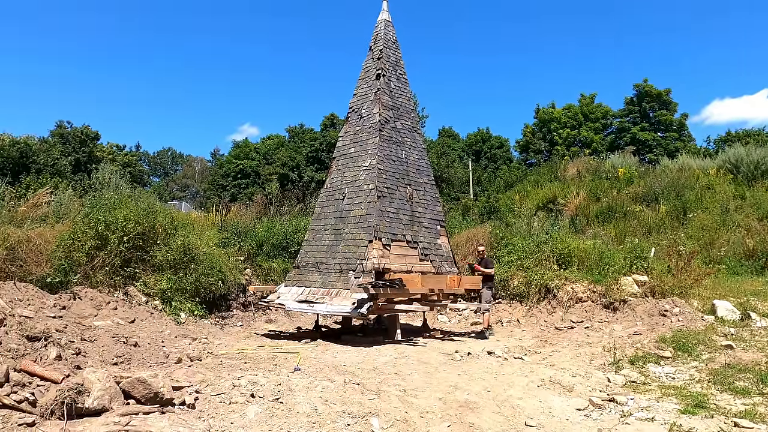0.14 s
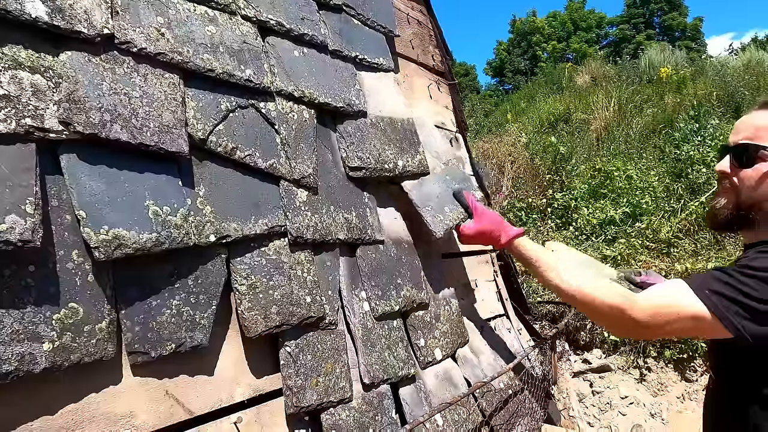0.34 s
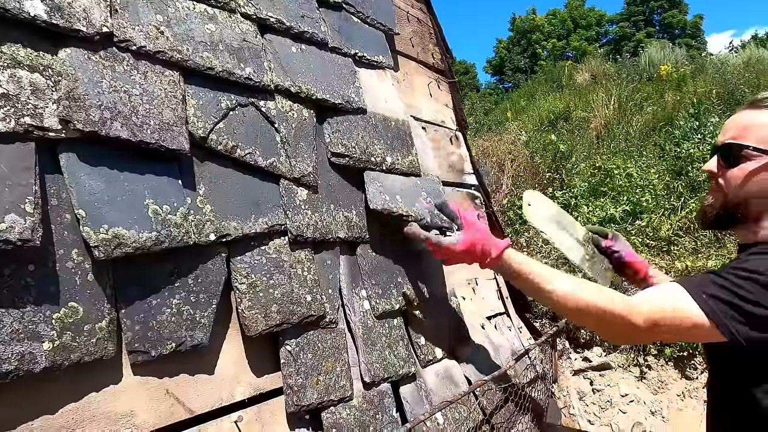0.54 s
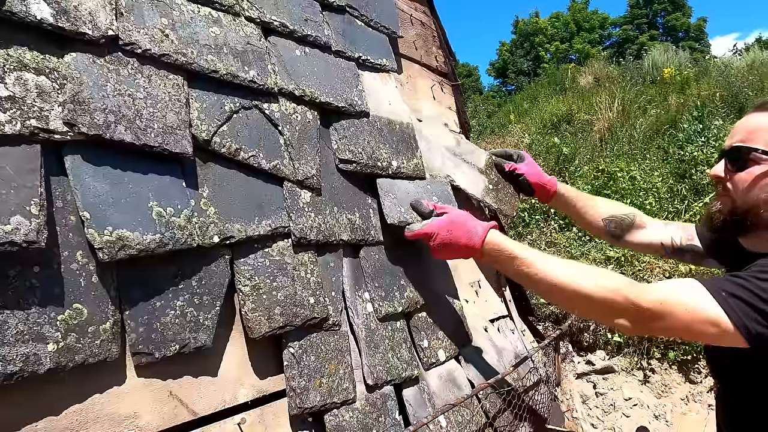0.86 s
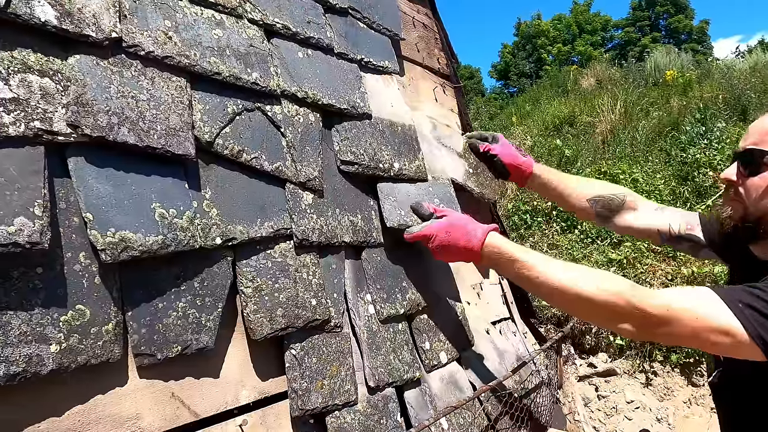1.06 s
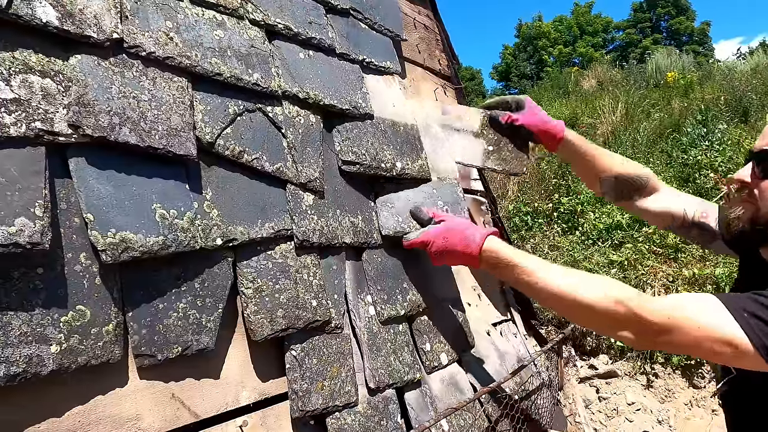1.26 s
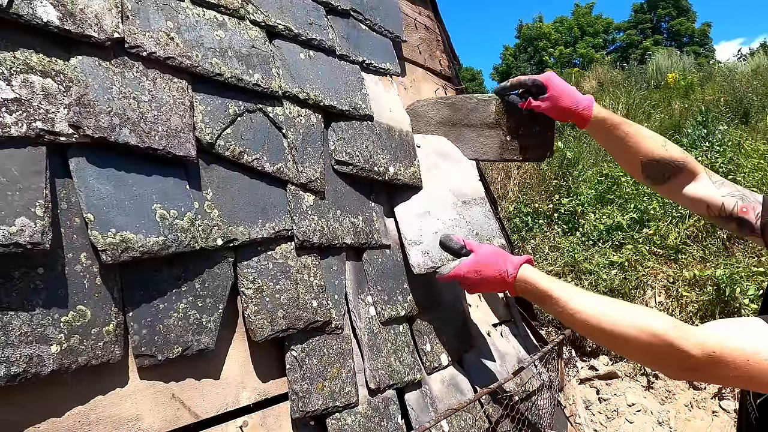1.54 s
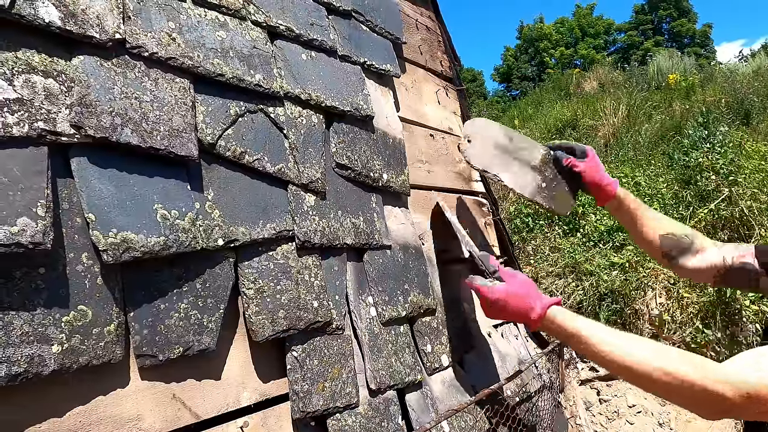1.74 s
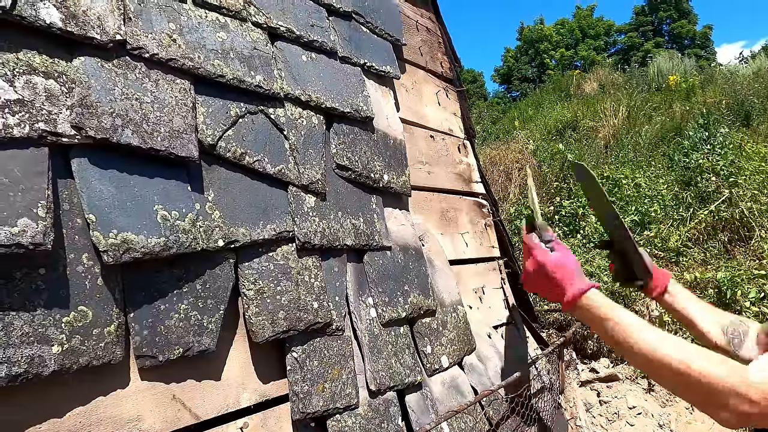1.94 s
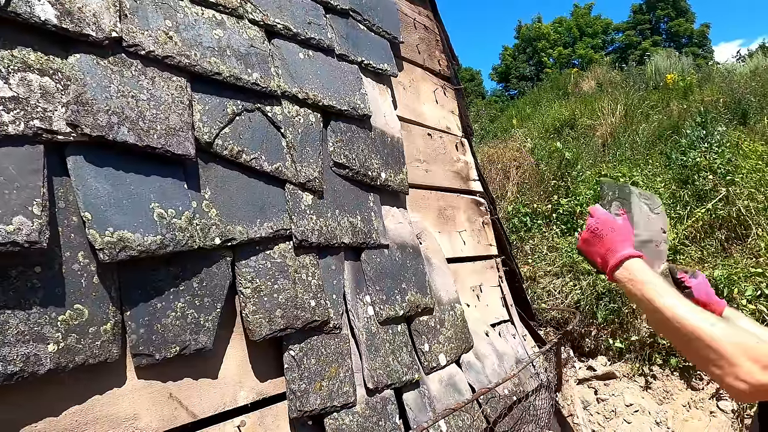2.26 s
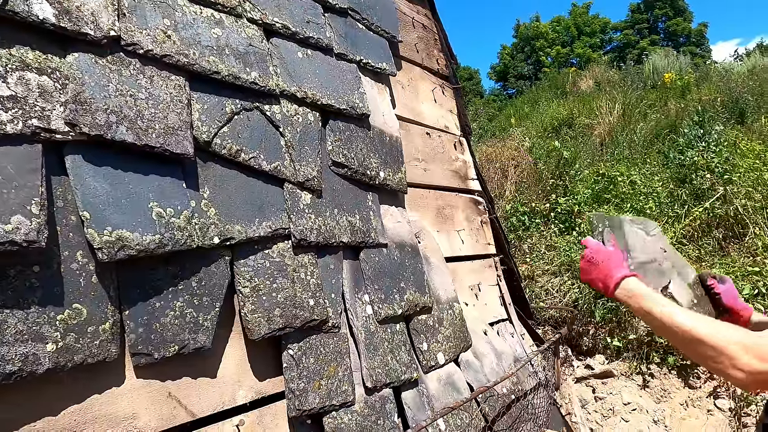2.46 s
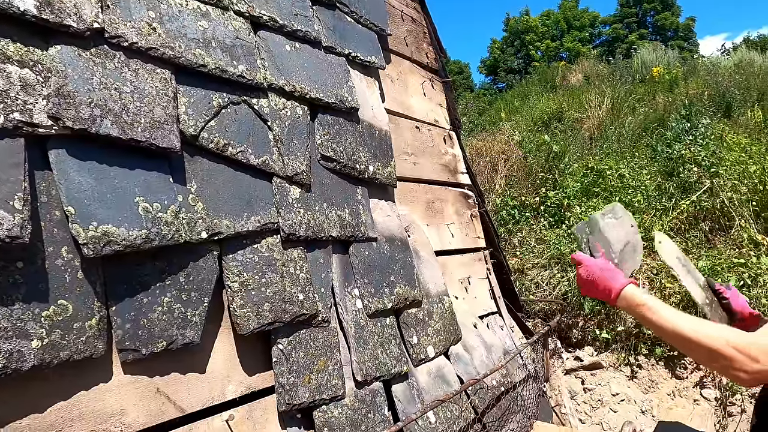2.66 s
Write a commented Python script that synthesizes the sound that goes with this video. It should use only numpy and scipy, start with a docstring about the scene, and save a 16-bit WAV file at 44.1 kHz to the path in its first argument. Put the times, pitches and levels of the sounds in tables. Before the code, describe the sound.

Slate scrapes and clacks harshly as it is pulled off a boarded roof, over low wind rumble.

```python
"""Outdoors, gloved hands work a slate loose from a boarded roof: crushed grit grinds, and each jolt excites
the damped resonances of the slate, the heavy ones with a thump of the boarding; loosened grit trickles.
Two loose slates are then rubbed and clinked together: noise and cracks excite their modes. A soft low hoot
is a sine of wavering pitch. Roof and ground answer as a decaying noise tail. Wind rumbles on the microphone
ports as gusty low noise that differs between left and right, over a faint open-air hiss."""
import sys
import numpy as np
from scipy import signal
from scipy.fft import rfft, irfft, next_fast_len
from scipy.io import wavfile
from scipy.ndimage import map_coordinates

SR = 44100
rng = np.random.default_rng(int(sys.argv[2]) if len(sys.argv) > 2 else 0)


def invert_db(level):
    """Linear amplitude ratio for a level in decibels (20 dB per decade), elementwise."""
    return 10 ** (np.asarray(level, dtype=float) / 20)


def transcribe(u):
    """Save the signal u as a 16-bit wav file named by the first command-line argument.

    u: samples, shape (n,) or (channels, n), limited to [-1, 1]; the rate is SR.
    q: integer samples, one column per channel.
    """
    v = np.clip(np.atleast_2d(u).T, -1, 1)
    q = np.round(v * 32767).astype(np.int16)
    wavfile.write(sys.argv[1], SR, q)


N = 123480  # samples

# Broad spectrum of slate on slate. Each row: frequency in Hz, relative level in dB per Hz.
GRIND_COLOUR = [(60, -49), (110, -11), (200, 0.5), (420, -3.5), (900, -3.5), (2500, -3.5), (4500, -14),
                (7000, -31), (11000, -49.5), (14500, -65), (15800, -82)]
# Resonances of the slate held in the roof. Each row: frequency in Hz, width in Hz, relative level in dB.
HELD_RESONANCES = [(860, 70, 1), (1015, 80, 2), (1305, 90, 2), (1740, 110, 0), (2210, 100, 2),
                   (2525, 70, 1), (2995, 100, 1), (3450, 90, 3), (3880, 90, 3), (4780, 110, 7),
                   (5850, 120, 7)]
# Modes of the two loose slates. Each row: frequency in Hz, relative level in dB, undamped t60 in seconds.
THICK_SLATE = [(478, -21, .08), (856, -14, .09), (1303, -1, .12), (1405, -5, .08), (1744, -12, .09),
               (2240, -4, .09), (2632, -14, .06), (3343, -8, .06), (3990, -10, .06), (4400, -13, .06)]
THIN_SLATE = [(1096, -14, .13), (1895, -6, .12), (2998, -4, .1), (5502, -15, .05), (5800, -14, .04)]

BROAD_SHARE = .75  # share of the force heard between the resonances
SHIFTING_DB = 5  # spread of each resonance's level; halved for the knocks
SEAT_S = .0004  # time constant of a contact's rise


def unit(x):
    """Normalization: scale to rms 1."""
    return x / np.sqrt(np.mean(x ** 2) + 1e-20)


def along(points, hz):
    """Interpolation of (Hz, value) points on a logarithmic frequency axis."""
    f, v = np.transpose(points)
    return np.interp(np.log(hz + 1), np.log(f + 1), v)


def curves(rows, outside=None):
    """Linear interpolation in time: one value per sample for each column after the time."""
    s, *cols = np.transpose(rows)
    return [np.interp(np.arange(N) / SR, s, c, outside, outside) for c in cols]


def wobble(rate):
    """Slow random modulation: a smooth curve through rate random knots a second."""
    knots = rng.standard_normal(int(N * rate / SR) + 4)
    return map_coordinates(knots, [np.arange(N) * rate / SR])


def filtered(x, response):
    """Linear filtering: the spectrum of x times a complex response of frequency."""
    n = x.shape[-1]
    m = next_fast_len(n + SR // 4)
    return irfft(rfft(x, m) * response(np.fft.rfftfreq(m, 1 / SR)), m)[..., :n]


def resonances(peaks, hz):
    """Damped oscillators in parallel, causal and of alternating sign; peaks hold Hz, width in Hz, dB."""
    return sum((-1) ** k * invert_db(db) * 1j * hz * width / (centre * centre - hz * hz + 1j * hz * width)
               for k, (centre, width, db) in enumerate(peaks))


def tilt(hz, db_per_octave):
    """Spectral slope: a gain that leans about 2 kHz."""
    return invert_db(db_per_octave * np.log2((hz + 50) / 2000))


def grit(n, per_s, spread_db, share):
    """Granular friction: sparse grains of uneven size over fine noise; share is the grains' power."""
    sizes = invert_db(spread_db * rng.standard_normal(n).clip(-2, 2))
    grains = (rng.random(n) < per_s / SR) * rng.choice([-1, 1], n) * sizes
    share = np.clip(share, 0, 1)
    return np.sqrt(share) * unit(grains) + np.sqrt(1 - share) * rng.standard_normal(n)


def struck(force, t, t60, colour):
    """Impulsive excitation: a dying burst of force through a colour, scaled by its undecayed level."""
    return filtered(force * invert_db(-60 * t / t60), colour) / np.std(filtered(force, colour))


def ring(modes, t, scatter_db, db_per_octave=0, damping=1):
    """Modal synthesis: a sum of dying sines at scattered levels; damping acts most on the high modes."""
    total = 0
    for hz, db, t60 in modes:
        loss_db = 60 * t * damping ** (min(hz, 3000) / 2200) / t60
        level = invert_db(db + rng.normal(0, scatter_db) - loss_db)
        total = total + level * tilt(hz, db_per_octave) * np.sin(2 * np.pi * hz * t)
    return total


def held_slate(hz, shifts_db):
    """Source and resonator: the broad grinding colour with the slate's damped resonances on top."""
    peaks = [(centre, width, db + shift)
             for (centre, width, db), shift in zip(HELD_RESONANCES, shifts_db)]
    return invert_db(along(GRIND_COLOUR, hz)) * (BROAD_SHARE + resonances(peaks, hz))


def drag():
    """Friction: crushed grit excites the slate; harder strokes are brighter and resonances come and go."""
    # Strokes of slate over slate. Each row: time in seconds, level in dB.
    strokes = [(.215, -84), (.23, -34.5), (.33, -39), (.385, -32.5), (.43, -29), (.47, -23), (.56, -21.5),
               (.63, -25), (.675, -42.5), (.71, -33), (.76, -26), (.8, -38.5), (.825, -37.5), (.86, -44),
               (.98, -38), (1.03, -46.5), (1.12, -45.5), (1.24, -52.5), (1.28, -25), (1.35, -23),
               (1.42, -28.5), (1.47, -24.5), (1.6, -17), (1.64, -26), (1.7, -20.5), (1.74, -52),
               (1.78, -27), (1.85, -41), (1.93, -69)]
    dull_db, bright_db = -42, -14  # stroke levels at which the sound is dullest and brightest
    level_db, = curves(strokes, -120)
    force = grit(N, 1400, 3.5, .55) * invert_db(2.5 * wobble(120).clip(-2, 2))
    rung = 0
    for peak in HELD_RESONANCES:
        contact = invert_db(SHIFTING_DB * wobble(16).clip(-2, 2))  # changes as the contact moves
        rung = rung + filtered(force * contact, lambda hz: resonances([peak], hz))
    dull, sharp = (filtered(BROAD_SHARE * force + rung,
                            lambda hz: invert_db(along(GRIND_COLOUR, hz)) * tilt(hz, lean))
                   for lean in (-3, 2.5))  # dB per octave
    mix = np.clip((level_db - dull_db) / (bright_db - dull_db), 0, 1)
    return invert_db(level_db) * ((1 - mix) * unit(dull) + mix * unit(sharp))


def knocks():
    """Impact: each jolt is a dying rattle through the held slate, raised around its own pitch."""
    # Each row: start in seconds, relative level in dB, pitch in Hz, t60 of the force in seconds.
    jolts = [(0.22, -15.5, 1770, 0.051), (0.242, -16.5, 1940, 0.034), (0.275, -12.5, 1750, 0.085),
             (0.395, -4, 1040, 0.077), (0.477, -15, 1210, 0.077), (0.517, -12.5, 1760, 0.078),
             (0.7, -23, 1210, 0.046), (0.815, -24.5, 1480, 0.14), (0.89, -7, 1012, 0.18),
             (0.899, -10.5, 2450, 0.071), (0.942, -16.5, 3560, 0.069), (1.037, -8.5, 4540, 0.072),
             (1.058, -9, 1074, 0.13), (1.255, -9, 987, 0.19), (1.296, -9.5, 1204, 0.17),
             (1.314, -11, 1540, 0.24), (1.392, -9.5, 1690, 0.065), (1.482, -7, 1313, 0.091),
             (1.496, -22, 1313, 0.045), (1.552, -16, 2140, 0.053), (1.575, -6, 3500, 0.038),
             (1.617, -12.5, 5000, 0.16), (1.63, -6.5, 2480, 0.065), (1.649, -11, 3020, 0.11),
             (1.674, -12.5, 1520, 0.15), (1.706, -9.5, 3130, 0.092), (1.727, -7, 4050, 0.078),
             (1.787, -9.5, 2374, 0.093), (1.867, -32, 3630, 0.056)]
    sharpness, height_db = 14, 14  # of the resonance at each jolt's pitch
    out, t = np.zeros(N + SR), np.arange(SR // 4) / SR
    shifts_db = SHIFTING_DB / 2 * rng.standard_normal((len(jolts), len(HELD_RESONANCES))).clip(-2, 2)
    for (start, db, pitch_hz, t60), shift in zip(jolts, shifts_db):
        clack = [(pitch_hz, pitch_hz / sharpness, height_db)]
        bright = 0.5 * np.log2(pitch_hz / 2000)  # dB per octave: higher jolts lean brighter
        colour = lambda hz: held_slate(hz, shift) * tilt(hz, bright) * (1 + resonances(clack, hz))
        rattle = struck(grit(len(t), 2500, 2.5, 0.28), t, t60, colour)
        out[round(start * SR):][:len(t)] += invert_db(db - 7.5) * rattle * (1 - np.exp(-t / SEAT_S))
    return out[:N]


def thumps():
    """Modal response: the heavy jolts set the low modes of the boarding ringing."""
    # Blows on the boarding. Each row: start in seconds, relative level in dB.
    blows = [(0.277, -33), (0.393, -26), (0.892, -17.5), (0.908, -17), (1.05, -19.5), (1.063, -22),
             (1.258, -21), (1.79, -21)]
    # Modes of the boarding. Each row: frequency in Hz, relative level in dB, t60 in seconds.
    board_modes = [(139, -11, 0.1), (206.5, 1, 0.096), (260.6, -2.5, 0.094)]
    out, t = np.zeros(N + SR), np.arange(SR // 4) / SR
    for start, db in blows:
        out[round(start * SR):][:len(t)] += invert_db(db) * ring(board_modes, t, 5.0) * (1 - np.exp(-t / 0.0025))
    return out[:N]


def crumbs():
    """Random small impacts: loosened grit trickles down the roof as dry ticks over a faint rustle."""
    # Trickle of grit. Each row: time in seconds, level in dB.
    trickle = [(.3, -72.5), (1.2, -67.5), (1.94, -72), (1.96, -59), (2.03, -68), (2.3, -74.5), (2.5, -92.5)]
    level_db, = curves(trickle, -120)
    ticks = filtered(grit(N, 90, 5, .5), lambda hz: resonances([(4800, 6000, 0)], hz) ** 3)
    return invert_db(level_db) * unit(ticks)


def clinks():
    """Impact of two plates: a short crack, then the modes of both ring, damped by the fingers."""
    # Each row: start in seconds, relative level in dB, brightness in dB per octave,
    # finger damping as a factor on the decay rate at 2200 Hz, level of the thin slate's modes in dB.
    touches = [(2.128, -6, 3.5, 0.77, 3.5), (2.201, -34.5, 7.5, 0.5, -7), (2.477, -39.5, -4.5, 1.2, -13),
               (2.486, -28.5, -2.5, 1, -21), (2.499, -3, -2, 1.19, -17), (2.568, -17.5, 0.5, 0.7, -4)]
    # Broad spectrum of the crack. Each row: frequency in Hz, relative level in dB.
    crack_colour = [(200, -11.5), (1000, -28.5), (2200, 10), (3600, -8), (6000, -10.5), (9000, -26.5),
                    (15000, -99)]
    # Resonances of the edges that meet. Each row: frequency in Hz, width in Hz, relative level in dB.
    edge_peaks = [(2220, 130, 11), (3480, 200, 16)]
    crack_db, crack_t60_s, ring_db = 4.5, 0.013, -15.5
    out, t = np.zeros(N + SR), np.arange(SR // 3) / SR
    rise = 1 - np.exp(-t / SEAT_S)
    for start, db, bright, damping, thin_db in touches:
        colour = lambda hz: invert_db(along(crack_colour, hz)) * (1 + resonances(edge_peaks, hz)) * tilt(hz, bright)
        crack = struck(rng.standard_normal(len(t)) * rise, t, crack_t60_s, colour)
        modes = ring(THICK_SLATE, t, 0.76, bright, damping)
        modes = modes + invert_db(thin_db) * ring(THIN_SLATE, t, 0.52, bright, damping)
        clink = invert_db(crack_db) * damping ** 1.5 * crack + invert_db(ring_db) * modes
        out[round(start * SR):][:len(t)] += invert_db(db) * clink * rise
    return out[:N]


def rub():
    """Sliding friction: gloves and slate faces make light noise that stirs the loose slates' modes."""
    # Rubbing of the loose slates in the gloves. Each row: time in seconds, level in dB.
    slides = [(1.85, -88), (1.94, -55), (1.97, -50), (2.07, -60.5), (2.12, -52), (2.24, -55.5),
              (2.36, -62.5), (2.46, -64.5), (2.56, -61.5), (2.6, -52.5), (2.675, -55), (2.7, -61.5),
              (2.8, -56)]
    # Broad spectrum of the rubbing. Each row: frequency in Hz, relative level in dB per Hz.
    rub_colour = [(400, -2.5), (900, 5), (1300, 10), (2500, 12.5), (6000, -3.5), (14000, -53)]
    level_db, = curves(slides, -120)
    force = grit(N, 700, 4, .4) * invert_db(1.5 * wobble(40).clip(-2, 2))
    modes = [(hz, 1.9 / t60, db) for hz, db, t60 in THICK_SLATE + THIN_SLATE]  # width goes as 1 / t60
    friction = unit(filtered(force, lambda hz: invert_db(along(rub_colour, hz))))
    rung = unit(filtered(force, lambda hz: resonances(modes, hz)))
    return invert_db(level_db) * unit(friction + invert_db(-10.5) * rung)


def hoot():
    """Frequency modulation: a soft low sine whose phase is the running sum of a wavering pitch."""
    # Each row: time in seconds, frequency in Hz, rms level in dB.
    tone = [(2.68, 442, -70), (2.715, 490, -46.5), (2.75, 442, -63), (2.8, 444, -53)]
    hz, = curves([row[:2] for row in tone])
    _, level_db = curves(tone, -120)
    return np.sqrt(2) * invert_db(level_db) * np.sin(2 * np.pi * np.cumsum(hz) / SR)


def surroundings(x):
    """Early reverberation: roof and ground answer with noise that decays at its own rate per frequency."""
    # Each row: frequency in Hz, t60 in seconds, relative energy in dB.
    answer = [(150.7, 0.38, -21), (1470, 0.072, -11.5), (4860, 0.045, -6.5), (8600, 0.023, 4.5)]
    hz, t, z = signal.stft(rng.standard_normal((2, SR // 4)), SR, nperseg=128)
    t60, db = (along([(row[0], row[k]) for row in answer], hz)[:, None] for k in (1, 2))
    decay = invert_db(db - 60 * t / t60)
    decay = decay / np.sqrt(t60 * SR / (6 * np.log(10)))  # energy independent of t60
    tail = signal.istft(z * decay, SR, nperseg=128)[1]
    delayed = np.pad(x, (130, 0))  # samples
    return signal.fftconvolve(delayed[None], tail, axes=1)[:, :N]


def rush(spectrum, alike):
    """Partial coherence: stereo noise of rms 1, its mid and side shares set by left-right likeness."""
    turn = lambda hz: np.arccos(np.clip(along(alike, hz), -1, 1)) / 2
    mid, side = filtered(rng.standard_normal((2, N)),
                         lambda hz: invert_db(along(spectrum, hz)) * [np.cos(turn(hz)), np.sin(turn(hz))])
    return unit(np.array([mid + side, mid - side]))


def wind():
    """Turbulence noise: gusty rumble on the ports, and a faint hiss that follows its slow level."""
    # Slow course of the wind. Each row: time in seconds, level in dB.
    gusts = [(0, -33.5), (.15, -36.5), (.9, -44.5), (1.1, -38.5), (1.5, -39), (1.95, -45.5), (2.2, -50),
             (2.8, -47)]
    # Spectra of rumble and open air. Each row: frequency in Hz, relative level in dB per Hz.
    rumble_colour = [(20, 1), (155, -6.5), (295, -23), (426, -31), (600, -37.5), (780, -82), (1320, -120)]
    air_colour = [(300, -11), (1200, 0), (5000, -24), (14000, -50.5)]
    # Coherence of the rumble. Each row: frequency in Hz, left-right likeness from 0 to 1.
    likeness = [(30, .72), (80, .85), (130, 1)]
    level_db, = curves(gusts)
    balance_db = np.array([[.7], [-.7]])
    rumble = invert_db(level_db + 1.8 * wobble(12) + balance_db) * rush(rumble_colour, likeness)
    return rumble + invert_db(level_db - 31.5) * rush(air_colour, [(1000, 1.0)])  # the hiss is alike in both


def scene():
    """Interaural cues: level and arrival differences place the work, which reaches the right port first."""
    # Left over right balance of the roof work. Each row: frequency in Hz, difference in dB.
    lean = [(300, 0), (2000, 0.7), (6000, -1.5), (12000, -12.5)]
    loose_lean_db = -0.5  # left over right
    left_lag_s, lag_fades_hz = 3.6e-5, 9500
    roof = drag() + knocks() + thumps() + crumbs()
    loose = clinks() + rub() + hoot()
    side = np.array([[.5], [-.5]])  # half of each difference to either port
    lag = lambda hz: np.exp(-2j * np.pi * hz * left_lag_s * side / (1 + (hz / lag_fades_hz) ** 2))
    near = filtered(roof, lambda hz: invert_db(side * along(lean, hz)) * lag(hz))
    near = near + filtered(loose, lambda hz: invert_db(side * loose_lean_db) * lag(hz))
    return near + surroundings(roof + loose) + wind()


def roll_off(x):
    """The treble ends steeply here."""
    return signal.sosfilt(signal.butter(12, 15780, fs=SR, output="sos"), x)


def record(dry):
    """Signal chain: the finished mix goes through the last stage unaltered in level."""
    return roll_off(dry)


dry = scene()
out = record(dry)
transcribe(out)
```